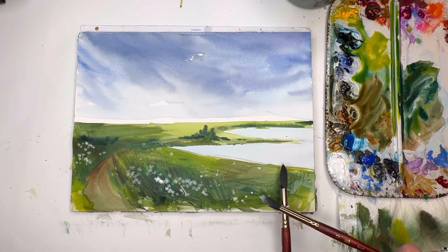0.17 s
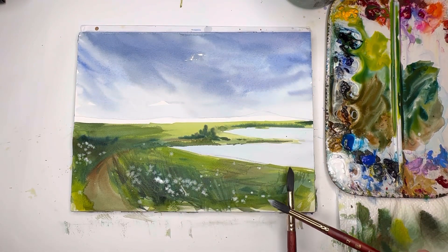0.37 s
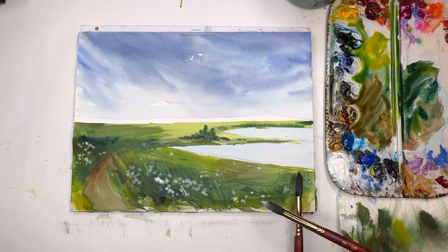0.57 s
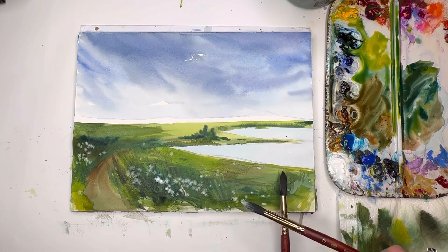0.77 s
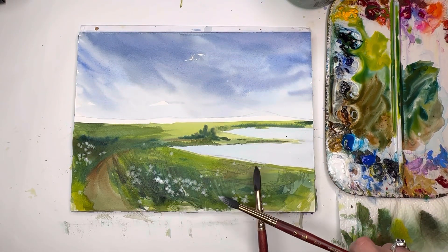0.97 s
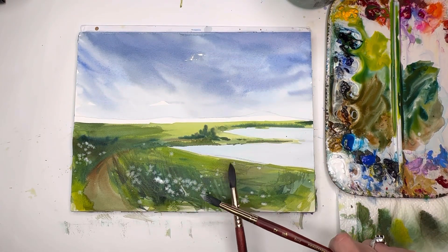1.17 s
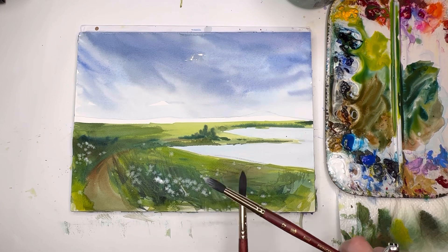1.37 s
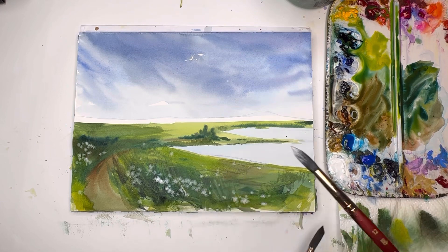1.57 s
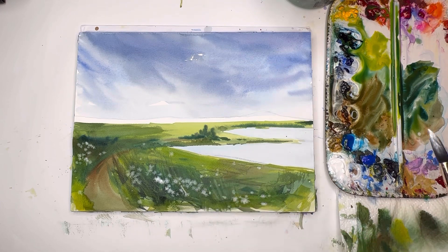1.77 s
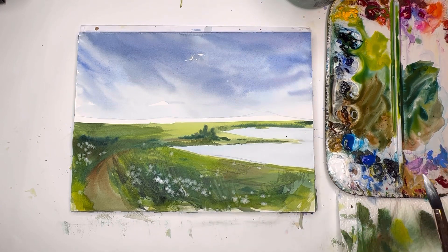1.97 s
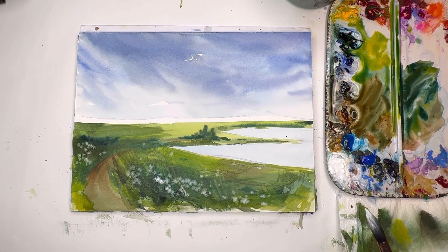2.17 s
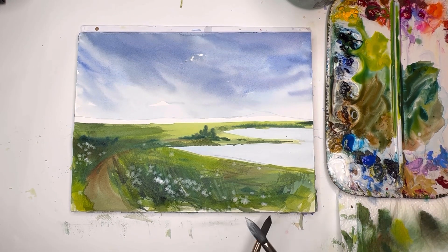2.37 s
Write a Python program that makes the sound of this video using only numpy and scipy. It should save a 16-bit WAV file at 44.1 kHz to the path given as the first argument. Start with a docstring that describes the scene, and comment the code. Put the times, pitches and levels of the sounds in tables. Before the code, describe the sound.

Close, dry, high clicks of wooden brush handles and metal ferrules, nine in an even row, some doubled by a bounce, over a desk in a small quiet room; afterwards only background hiss, faint ticks and a dull bump.

```python
"""Room rumble, hiss and wavering mains hum run throughout, as shaped noise and sine lines.
Over them two paintbrushes are tapped together nine times above paper on a desk, close by.
Each blow sums decaying modes of handle and ferrule; most rebound once or twice; a small room answers.
Some blows carry a half-sine thump of overload. Later come faint ticks (decaying sines),
a low bump (alternating pressure swings) and a brief noise rustle."""
import sys
import numpy as np
from scipy import signal
from scipy.io import wavfile
from scipy.ndimage import uniform_filter1d

SR = 44100
rng = np.random.default_rng(int(sys.argv[2]) if len(sys.argv) > 2 else 0)


def how_loud(loudness_db):
    """Turn decibels into a plain amplitude multiplier (0 dB gives 1, 20 dB gives 10)."""
    steps = np.asarray(loudness_db, float) / 20
    return 10 ** steps


def digitize_waveform(pressure):
    """Quantize a signal to 16-bit integers and store it at the path in sys.argv[1].

    Rows of a 2-D input are taken as channels; values are limited to [-1, 1].
    """
    field = np.atleast_2d(pressure).T
    bounded = np.clip(field, -1, 1)
    quanta = np.round(bounded * 32767).astype(np.int16)
    wavfile.write(sys.argv[1], SR, quanta)


N = 106457  # length [samples]

# Background spectra before scaling: (frequency [Hz], relative level per hertz [dB])
RUMBLE_SPECTRUM = [(8.8, -31), (15, 8.5), (27, -5), (65, -2.5), (87, -19), (147, -16.5), (204, -30.5),
                   (227, -21), (262, -30), (350, -27), (460, -55.5), (770, -120)]
HISS_SPECTRUM = [(190, -31), (330, -2), (450, -6), (700, -7), (940, -10), (2160, -15), (9500, -13),
                 (15000, -20), (16300, -30)]
# Mains hum and other low lines: (frequency [Hz], level about which it wavers [dB rms])
HUM_LINES = [(59.4, -64), (120, -77), (140, -72), (238, -81.5)]
# Blows; where each lands sets the balance of its mode groups:
# (time [s], knock level [dB], body level [dB], lower level [dB], middle level [dB], upper level [dB])
BLOWS = [(-.0005, -37.5, -36.5, -24, -18, -12.5), (0.1787, -31, -26, -21.5, -11, -10),
         (0.3274, -38, -32, -29, -20, -15.5), (.4950, -35.5, -30, -20.5, -11.5, -14),
         (0.648, -35.5, -34, -16.5, -13, -16), (.8282, -38.5, -41, -14, -16, -12),
         (1.0013, -49.5, -34.5, -18.5, -11, -8), (1.159, -37, -36.5, -16.5, -16, -14),
         (1.311, -39.5, -35, -41, -20.5, -20.5)]
# Rebounds of the same brushes: columns as for the blows
REBOUNDS = [(.0057, -65.5, -38, -20.5, -24.5, -29), (0.3338, -64, -42, -25, -40.5, -33.5),
            (0.6579, -53.5, -46, -21, -18.5, -25.5), (0.8438, -49, -45.5, -26.5, -22, -23.5),
            (1.0170, -52.5, -47, -21.5, -23, -23), (1.0122, -68.5, -53, -31, -32, -33),
            (1.1713, -62, -39, -29, -19, -25.5), (1.1753, -54, -45, -29, -40, -33),
            (1.323, -85, -56, -48, -47, -36.5)]
# Modes of handle (knock, body) and ferrule (the rest), before detuning, level spread and the ring limit:
# (frequency [Hz], level relative to group [dB], decay by 60 dB [s])
KNOCK_MODES = [(951, 0.5, 0.02), (1016.4, 2, .02), (1157, 1, 0.023)]
BODY_MODES = [(1860, -22, 0.0012), (2276, -12.5, 0.0066), (2600, 2.5, 0.003), (3190, 11.5, 0.0086),
              (3840, 6, 0.0062), (4677, 8.5, 0.0025)]
LOWER_MODES = [(5615, -4.5, 0.0048), (5750, 9, 0.0044), (6200, -18, .003)]
MIDDLE_MODES = [(6680, 2.89, 0.0061), (7410, 9.4, 0.005), (8000, 2, 0.001)]
UPPER_MODES = [(9800, -11.5, .003), (10380, 8, 0.0075), (11095, 0.5, 0.0043), (11880, 5.5, 0.0017),
               (13130, -11, .003), (14800, -18, 0.00296)]
# Echoes from paper, desk and nearby things: (mean delay [s], level relative to direct sound [dB])
ECHOES = [(.00045, -3), (.0008, -4), (.0011, -6), (.0028, -17), (.0040, -17)]
# Reverberation of the room: (frequency [Hz], decay by 60 dB [s])
ROOM_DECAY = [(500, .16), (1300, 0.27), (3500, 0.32), (7000, 0.26), (11000, 0.21), (15000, .2)]
# Short low thumps of overload at some blows: (time [s], peak level [dB])
THUMPS = [(.0001, -41), (.1793, -24.5), (.4955, -58), (.6495, -37), (1.0021, -23.5)]
# Faint ticks: (time [s], starting level before radiation [dB], frequency [Hz])
TICKS = [(1.6708, -36.5, 8000), (2.2297, -43, 5800), (2.386, -42, 5000)]
# Swings of the low bump, alternately up and down: (time [s], peak level [dB], Gaussian width [s])
BUMP_SWINGS = [(2.357, -54, 0.0017), (2.368, -27, 0.0042), (2.388, -31.5, 0.003), (2.398, -55.5, .004),
               (2.416, -32.5, 0.0041)]
# Rustle spectrum before scaling: (frequency [Hz], relative level per hertz [dB])
RUSTLE_SPECTRUM = [(240, -22), (400, -4), (1110, -0.5), (1440, -3), (3120, -13), (4650, -5), (13100, -16),
                   (16000, -41)]

LEAD_S = .01  # margin before time zero, for sounds that start early
PATCH_DB = .7  # rms drift of the patches in hiss and rustle
HANDLE_THIN_HZ, FERRULE_THIN_HZ, DULL_ABOVE_HZ = 810, 4110, 13640


def evened(x):
    """Normalization: divides by the root mean square, giving rms 1."""
    return x / np.sqrt(np.mean(x ** 2) + 1e-20)


def read(points, hz):
    """Linear interpolation on a logarithmic frequency axis."""
    f, value = np.transpose(points)
    return np.interp(np.log(hz + 1), np.log(f + 1), value)


def add(mix, s, sound):
    """Superposition: adds a sound at time s to a mix that begins LEAD_S before zero."""
    part = mix[round((s + LEAD_S) * SR):][:len(sound)]
    part += sound[:len(part)]


def coloured(points, size, patch_db):
    """Spectral shaping: random Fourier frames weighted by a spectrum with drifting patches."""
    frames = size // 512 + 5
    hz = np.fft.rfftfreq(2048, 1 / SR)
    real, imaginary, patches = rng.standard_normal((frames, 1025, 3)).T
    patches = uniform_filter1d(patches, size=20, axis=0)  # smooth across frequency
    patches = evened(uniform_filter1d(patches, size=6, axis=1))  # and across time
    level_db = read(points, hz)[:, None] + patch_db * patches
    spectrum = (real + 1j * imaginary) * how_loud(level_db)
    noise = signal.istft(spectrum, nperseg=2048, noverlap=1536)[1]
    return evened(noise[1024:][:size])


def background():
    """Stationary random noise: rumble and hiss are sums of shaped noise."""
    rumble = how_loud(-54.5) * coloured(RUMBLE_SPECTRUM, size=N, patch_db=0.0)
    hiss = how_loud(-69) * coloured(HISS_SPECTRUM, size=N, patch_db=PATCH_DB)
    return rumble + hiss


def hum():
    """Amplitude modulation: steady sine lines waver in level with a sum of slow sines."""
    waver_db = 3.0  # rms
    t = np.arange(N) / SR
    out = np.zeros(N)
    for hz, db in HUM_LINES:
        slow = [np.sin(2 * np.pi * (f * t + rng.random())) for f in np.geomspace(.5, 8, num=8)]
        level_db = db + waver_db * evened(sum(slow))
        out += np.sqrt(2) * how_loud(level_db) * np.sin(2 * np.pi * (hz * t + rng.random()))
    return out


def radiate(x, low_hz):
    """Radiation efficiency: a small object sends out little bass; the very top is dull."""
    band = signal.butter(4, [low_hz, DULL_ABOVE_HZ], "bandpass", fs=SR, output="sos")
    return signal.sosfilt(band, x)


def room(x):
    """Reverberation: sparse random taps form a quick desk scatter and a tail that dies band by band."""
    room_db, near_db = -11, -6.5  # energy of each response
    near_t60_s, start_s = 0.06, 0.0005
    size = SR // 2
    taps = rng.choice([-1., 1.], (2, size)) * (rng.random((2, size)) < .15)
    hz, t, z = signal.stft(taps[0], SR, nperseg=128)
    decay = how_loud(-60 * t / read(ROOM_DECAY, hz)[:, None])
    tail = signal.istft(z * decay, SR, nperseg=128)[1][:size]
    t = np.arange(size) / SR
    onset = np.clip(t / start_s - 1, 0, 1)  # silent until start_s, full at twice that
    tail = tail * onset
    near = taps[1] * how_loud(-60 * t / near_t60_s) * onset
    response = how_loud(room_db) * tail / np.linalg.norm(tail)
    response = response + how_loud(near_db) * near / np.linalg.norm(near)
    return signal.fftconvolve(x, response)


def surroundings(ring):
    """Reflection: delayed copies from nearby surfaces and the room's response join the direct sound."""
    jitter_s = .00003
    t = np.arange(0, .01, 1 / SR)
    delay, echo_db = np.transpose(ECHOES)
    delay = delay + jitter_s * rng.standard_normal(len(delay))
    # sinc pulses place the echoes between samples
    echoes = how_loud(echo_db)[:, None] * np.sinc(SR * (t - delay[:, None]))
    paths = (t == 0) + echoes.sum(0)
    wet = room(ring)
    add(wet, -LEAD_S, signal.fftconvolve(ring, paths))  # at the first sample
    return wet


def tap(*group_db):
    """Modal superposition: an impact starts the damped modes of handle and ferrule together."""
    detune, spread_db = .015, 1.5  # standard deviations: fraction of frequency, level
    longest_ring_s = .0045  # limits the decay time of all modes but the knock
    rise_s, start_turn = 0.000079, 0.31  # rise time constant; starting phase [turns]
    t = np.arange(0, .04, 1 / SR)
    groups = [KNOCK_MODES, BODY_MODES, LOWER_MODES, MIDDLE_MODES, UPPER_MODES]
    modes = []
    for group, level_db in zip(groups, group_db):
        for hz, db, t60 in group:
            ring_s = t60 if group is KNOCK_MODES else min(t60, longest_ring_s)
            modes.append((hz, db + level_db, ring_s))
    hz, db, t60 = np.transpose(modes)[:, :, None]
    chance = rng.standard_normal((2, len(hz), 1))
    envelope = how_loud(db + spread_db * chance[0] - 60 * t / t60)
    hz = hz * (1 + detune * chance[1])
    rings = envelope * np.sin(2 * np.pi * (hz * t + start_turn))
    rings = rings * (1 - np.exp(-t / rise_s))
    split = len(KNOCK_MODES) + len(BODY_MODES)
    handle = radiate(rings[:split].sum(0), HANDLE_THIN_HZ)
    ferrule = radiate(rings[split:].sum(0), FERRULE_THIN_HZ)
    return surroundings(handle + ferrule)


def thump(db):
    """Overload: a single half-sine thump, as when a loud peak overloads the recorder."""
    thump_s = .0004
    return how_loud(db) * np.sin(np.pi * np.arange(0, thump_s, 1 / SR) / thump_s)


def tick(db, hz):
    """Damped oscillation: a click of a few cycles, with the same reflections as the blows."""
    t60_s = .001
    t = np.arange(0, .005, 1 / SR)
    click = how_loud(db - 60 * t / t60_s) * np.sin(2 * np.pi * hz * t)
    return surroundings(radiate(click, HANDLE_THIN_HZ))


def bump():
    """Alternating displacement: Gaussian pressure swings of opposite sign follow one another."""
    t = np.arange(N) / SR
    out = np.zeros(N)
    for k, (s, db, width_s) in enumerate(BUMP_SWINGS):
        out += (-1) ** k * how_loud(db) * np.exp(-.5 * ((t - s) / width_s) ** 2)
    return out


def rustle():
    """Transient noise: a shaped noise burst rises quickly and decays exponentially."""
    level_db, rise_s, fade_db_per_s = -54.5, .001, -100
    t = np.arange(0, .05, 1 / SR)
    envelope = np.minimum(t / rise_s, 1) * how_loud(level_db + fade_db_per_s * t)
    return envelope * coloured(RUSTLE_SPECTRUM, size=len(t), patch_db=PATCH_DB)


def scene():
    """Linear superposition: blows and small events add to the continuous background."""
    events = np.zeros(N + round(LEAD_S * SR))
    for s, *group_db in BLOWS + REBOUNDS:
        add(events, s, tap(*group_db))
    for s, db in THUMPS:
        add(events, s, thump(db))
    for s, db, hz in TICKS:
        add(events, s, tick(db, hz))
    add(events, 2.3855, rustle())
    return (events[-N:] + background() + hum() + bump())[None]


def roll_off(x):
    """The treble ends steeply here."""
    return signal.sosfilt(signal.butter(12, 16540, fs=SR, output="sos"), x)


def record(dry):
    """Amplitude limiting: any peak beyond full scale is clipped."""
    mix = np.clip(dry, -1.0, 1.0)
    return roll_off(mix)


dry = scene()
out = record(dry)
digitize_waveform(out)
```